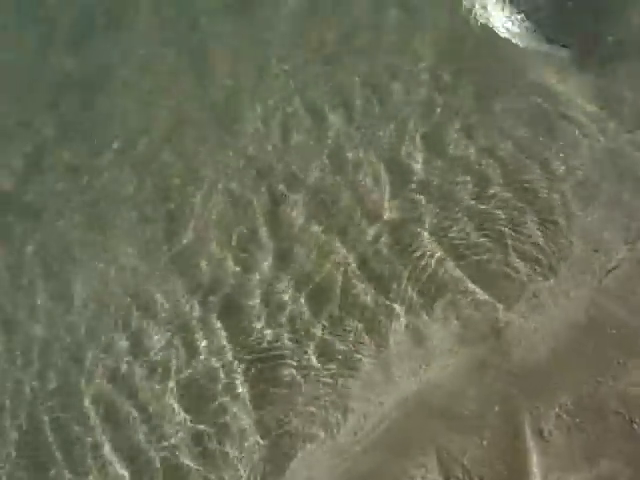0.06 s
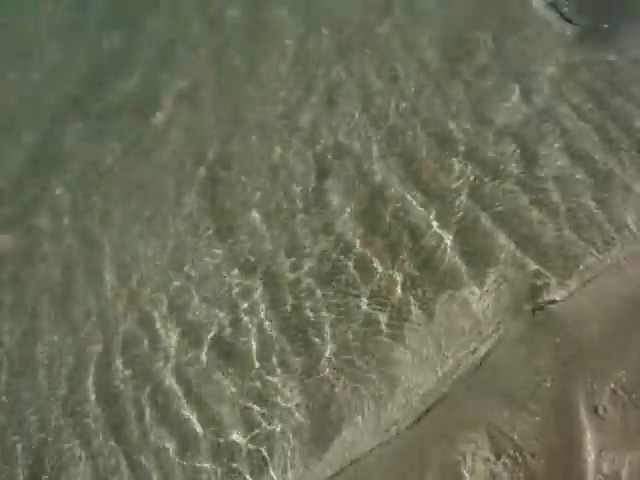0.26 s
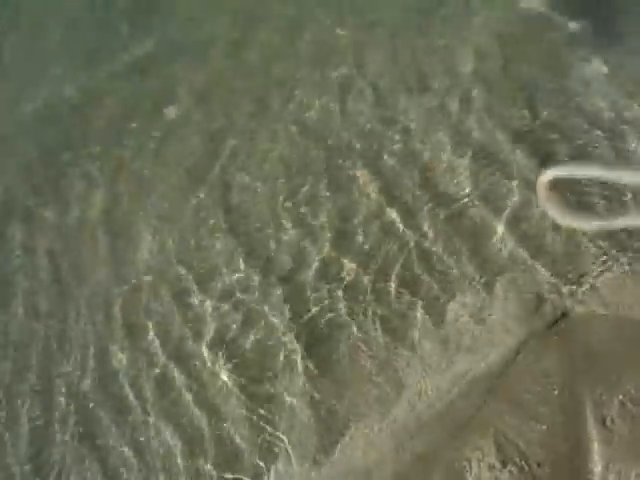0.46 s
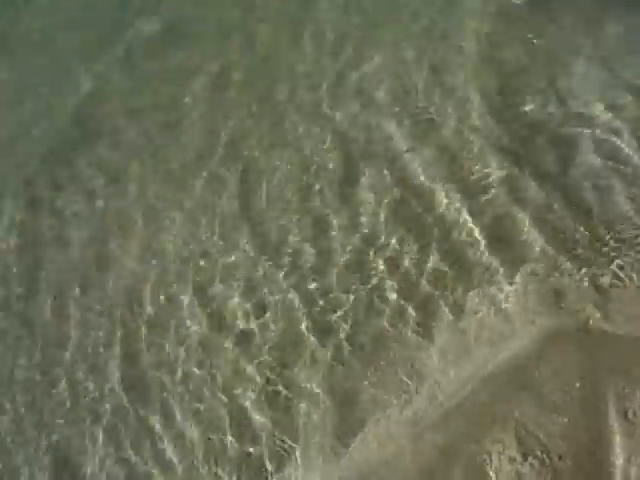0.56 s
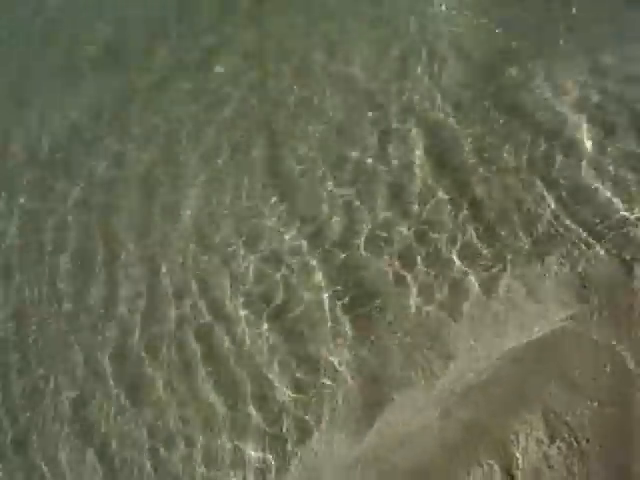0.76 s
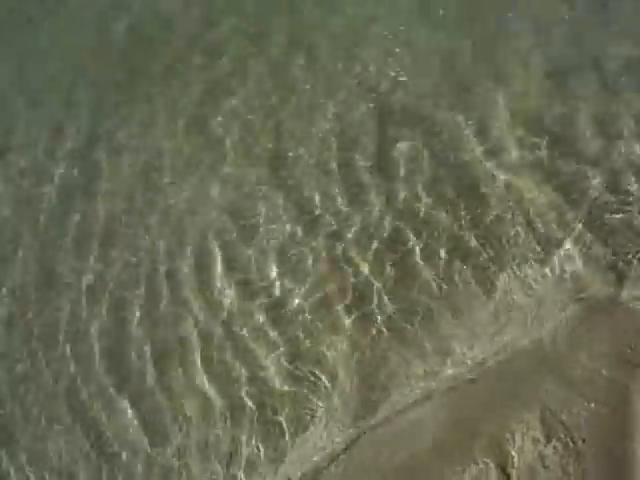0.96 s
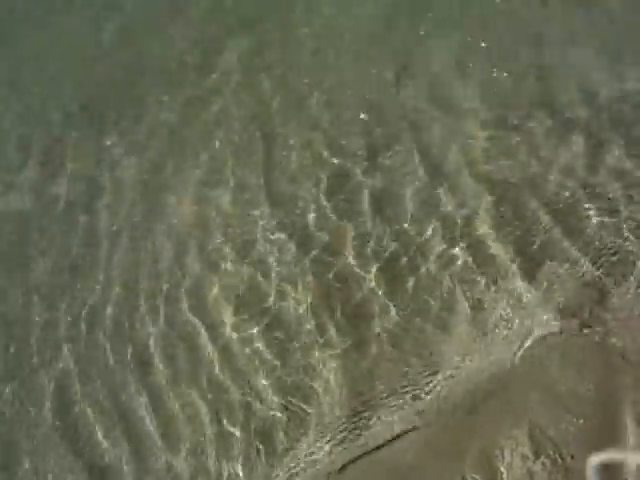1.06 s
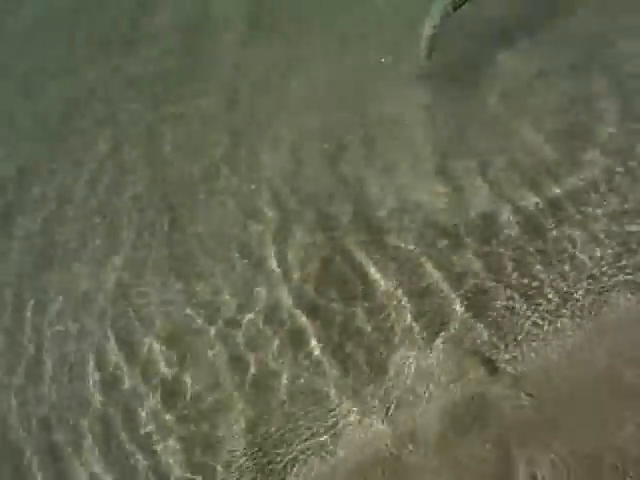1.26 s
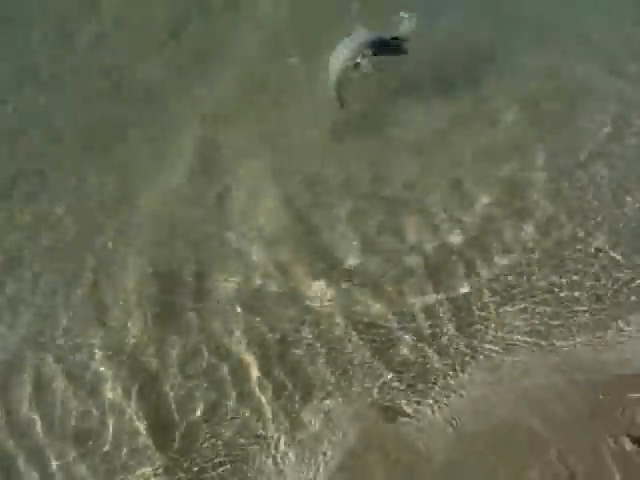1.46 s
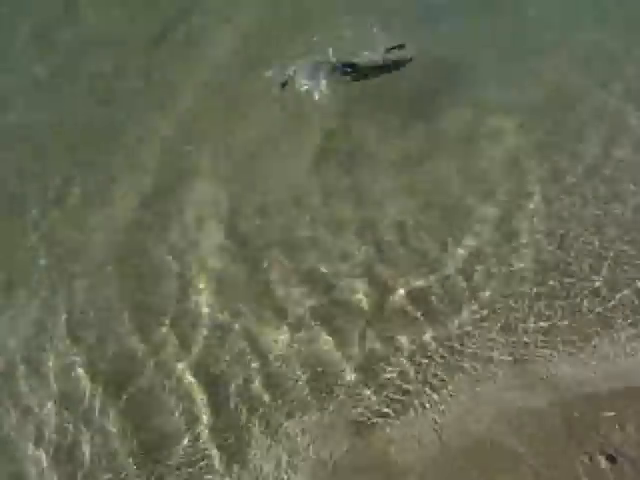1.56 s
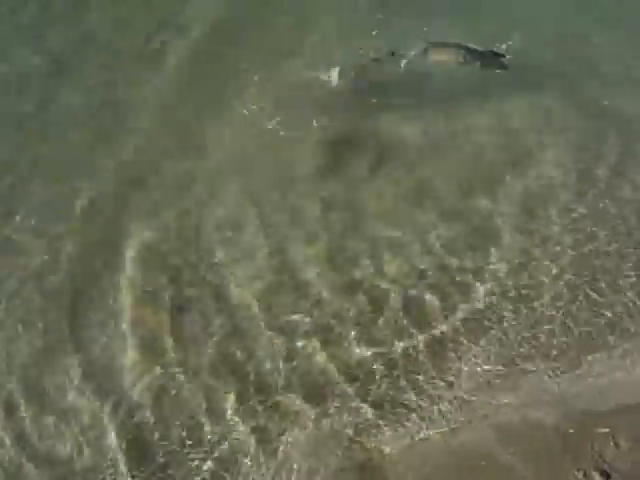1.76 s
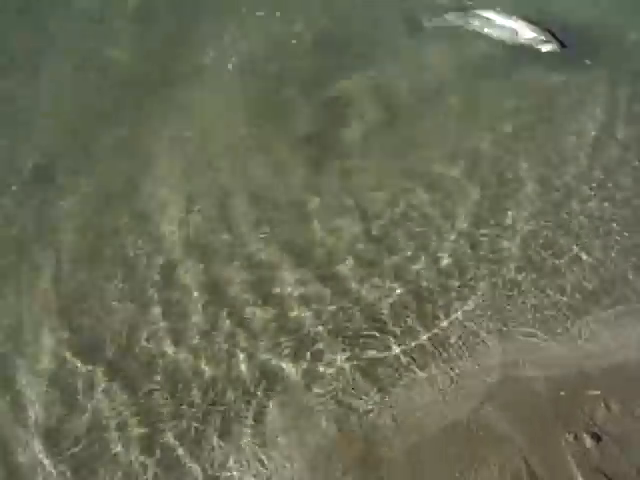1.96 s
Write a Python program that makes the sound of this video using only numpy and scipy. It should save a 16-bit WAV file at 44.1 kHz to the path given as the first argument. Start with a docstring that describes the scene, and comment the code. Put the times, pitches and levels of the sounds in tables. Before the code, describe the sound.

A fish thrashes in shallow water by a sandy shore. Soft trickling and low wind open, with a thump at 0.3 s; crisp slaps, spray and plops burst from 0.5 to 0.8 s, with a heavy wind bump near 0.6, then gurgles fade. Another bump comes at 1.04, a tiny plip at 1.28, and lighter splashes from 1.48 to 1.75, over steady hiss and faint high whine.

```python
"""A fish thrashes twice in shallow water off a sandy shore: slaps of spray built from showers of ringing
droplets, then plops and gurgles of trapped air, sung by short gliding sines.
Ripples trickle and fizz on the sand as finer droplets; wind rumbles as low coloured noise and bumps the
microphone with single push-pull swings.
The camera adds coloured hiss and a thin steady whine of three tones."""
import sys
import numpy as np
from scipy import signal
from scipy.fft import rfft, irfft
from scipy.io import wavfile
from scipy.ndimage import uniform_filter1d

SR = 44100
rng = np.random.default_rng(int(sys.argv[2]) if len(sys.argv) > 2 else 0)


def waveform_to_disk(signal):
    """Save audio, clipped to [-1, 1], as 16-bit WAV at the path in sys.argv[1]."""
    frames = np.transpose(np.atleast_2d(signal))
    scaled = np.clip(frames, -1, 1) * 32767
    samples = np.round(scaled).astype(np.int16)
    wavfile.write(sys.argv[1], SR, samples)


N = 88200  # two seconds
TIME = np.arange(N) / SR


def from_db(db):
    """Decibels to gain."""
    return 10 ** (np.asarray(db) / 20)


def rms_one(x):
    """Scale to unit rms."""
    return x / np.sqrt(np.mean(x ** 2) + 1e-20)


def add(out, start_s, sound):
    """Mix a sound in at its start time, cut at the end of the scene."""
    i = int(start_s * SR)
    out[i:i + len(sound)] += sound[:N - i]


def drift(rate):
    """Random wander: normal points of spread 1, rate per second, joined by straight lines."""
    return np.interp(TIME * rate, np.arange(1000), rng.standard_normal(1000))


def noise(colour, flicker_db):
    """Noise shaped by a spectral curve, with a flickering level; rms 1."""
    colour_hz, colour_db = np.transpose(colour)
    bin_hz = np.arange(N // 2 + 1) * SR / N
    gain = from_db(np.interp(np.log(bin_hz + 1), np.log(colour_hz), colour_db))
    coloured = irfft(rfft(rng.standard_normal(N)) * gain, N)
    flicker = from_db(flicker_db * drift(45.47))
    return rms_one(coloured * flicker)


def droplets(centre_hz, octaves, per_s, cycles, size_db, size):
    """Random droplets of uneven size ring for some cycles (to -60 dB), pitches spread round a centre; rms 1."""
    pitches = np.geomspace(350, 15000, 44)
    chance, sign, dealt = rng.random((3, size))
    drop_gain = from_db(size_db * np.minimum(rng.exponential(1, size), 5))
    clicks = (chance < per_s / SR) * np.sign(sign - .5) * drop_gain
    # deal each click a pitch from a bell curve in octaves
    weight = np.exp(-.5 * (np.log2(pitches / centre_hz) / octaves) ** 2)
    share = np.cumsum(weight)
    which = np.searchsorted(share / share[-1], dealt)
    out = np.zeros(size)
    for k, hz in enumerate(pitches):
        angle = 2 * np.pi * hz / SR
        radius = np.exp(-np.log(1000) * hz / (cycles * SR))
        zeros = np.sqrt(1 - radius * radius) * np.array([1, 0, -1])
        poles = [1, -2 * radius * np.cos(angle), radius * radius]
        # the tiny offset keeps the resonator clear of denormal numbers
        out += signal.lfilter(zeros, poles, clicks * (which == k) + 1e-18)
    return rms_one(out)


def camera():
    """Flickering hiss and a thin whine whose phase slides back through each camera frame, then jumps."""
    # hiss spectrum: (frequency [Hz], relative level [dB])
    hiss_colour = [(200, 5.5), (500, 1.5), (1000, 0.5), (2000, -2), (4000, -10.5), (6000, -8.5),
                   (8000, -4.5), (10000, -15.5), (12500, -4), (15500, -12.5)]
    # tones of the whine: (rms level [dB], phase slip per frame [cycles])
    whine_tones = [(-57, 0.51), (-53, 0.78), (-51.5, 0.56)]
    whine_hz, frames_per_s = (6606, 7522.5, 15045), 30
    out = from_db(-47) * noise(hiss_colour, flicker_db=2)
    # position within the frame, 0 to 1, with its jump smoothed
    frame = uniform_filter1d(TIME * frames_per_s % 1, size=130)
    for hz, (db, slip) in zip(whine_hz, whine_tones):
        tone = np.sin(2 * np.pi * (hz * TIME - slip * frame))
        out += from_db(db) * np.sqrt(2) * tone
    return out


def wind():
    """A low rumble of turbulence, and eddies that each push and pull the diaphragm once."""
    # rumble envelope: (time [s], level [dB])
    gusts = [(0, -49), (.25, -43.5), (.32, -31), (.37, -45.5), (.43, -34), (.6, -26), (.66, -36.5),
             (.73, -46), (.81, -29), (.9, -39), (1.05, -36), (1.12, -49), (1.4, -41), (1.46, -50.5),
             (1.68, -40), (1.75, -44.5), (1.86, -39), (2, -51)]
    # rumble spectrum: (frequency [Hz], relative level [dB])
    rumble_colour = [(20, -7), (45, -0.5), (90, 0), (150, -5.5), (250, -10.5), (400, -21), (800, -26.5),
                     (2000, -65)]
    # eddies bumping the microphone: (centre time [s], peak level [dB], nominal pitch [Hz])
    bumps = [(0.233, -28.5, 87.5), (0.305, -15, 175), (0.32, -37, 238), (.425, -25, 80), (0.477, -24.5, 85),
             (0.492, -20, 77), (.512, -23.5, 131), (0.5903, -10.5, 170), (0.599, -25.5, 141),
             (.615, -23.5, 132), (0.784, -21.5, 106), (1.025, -22, 105), (1.0383, -13.5, 218),
             (1.056, -24.5, 111), (1.376, -22.5, 243), (1.411, -31.5, 118), (1.678, -35, 56.3),
             (1.839, -29.5, 152)]
    bump_cycles, bump_skirt = 0.31, 0.31  # width in cycles of the pitch; narrowing of the skirts
    out = from_db(np.interp(TIME, *np.transpose(gusts))) * noise(rumble_colour, flicker_db=3)
    for centre_s, db, hz in bumps:
        u = (TIME - centre_s) * hz / bump_cycles
        swing = -u * np.exp(-u * u) / (1 + bump_skirt * u * u)
        out += from_db(db) * swing / swing.max()
    return out


def shore():
    """Ripples trickle and fine bubbles burst on the sand, both as showers of ringing droplets."""
    # strength of the lapping, on top of the trickle level: (time [s], level [dB])
    lapping = [(.14, 1.5), (.85, 2.5), (1.45, -6), (1.65, 4)]
    trickle = droplets(centre_hz=1900, octaves=.85, per_s=740, cycles=36, size_db=3, size=N)
    fizz = droplets(centre_hz=10800, octaves=0.19, per_s=220, cycles=18, size_db=4, size=N)
    trickle_db = -51 + np.interp(TIME, *np.transpose(lapping))
    return from_db(trickle_db) * trickle + from_db(-57) * fizz


def bubbles():
    """Trapped air rings unevenly, gliding in pitch and dying ever faster as it nears the surface."""
    # air pockets, level before envelope and flutter; a negative glide falls:
    # (time [s], starting pitch [Hz], level [dB], decay [s], glide [octaves/s])
    air_pockets = [(.5175, 666, -17, 0.0014, 6), (0.544, 1030, -30, 0.0088, 39),
                   (0.571, 6020, -22.5, 0.0033, -4), (0.636, 684, -29.5, 0.014, 72),
                   (0.733, 1897, -18.5, 0.0044, -31), (.7403, 7700, -31, 0.0019, -20),
                   (.7452, 3170, -20, 0.0013, 42), (0.7605, 2150, -26, 0.0054, 47),
                   (0.765, 5550, -25, 0.0016, -20), (.770, 1704, -31.5, 0.0086, -1),
                   (.801, 590, -38.5, 0.021, 3), (.825, 590, -31, 0.011, -20), (.834, 455.4, -28, 0.018, 9),
                   (.851, 656, -33, 0.019, 11.5), (.855, 930, -35, 0.013, 10.5),
                   (.893, 635, -33.5, 0.015, -4.5), (0.92, 1170, -31.5, 0.0048, 5.5),
                   (0.938, 1210, -32, 0.0031, -5), (1.102, 920, -32.5, 0.0057, -7),
                   (1.281, 1294, -27.5, 0.0027, -1), (1.493, 785, -19, 0.0015, 7),
                   (1.502, 1330, -31, 0.0027, 226), (1.542, 660, -30, 0.0063, -10),
                   (1.588, 320, -26.5, 0.0023, 2), (1.639, 732, -36, 0.015, 68),
                   (1.655, 1940, -29, 0.0029, 62), (1.6665, 2730, -27.5, 0.0025, -2),
                   (1.672, 746, -25.5, 0.015, 6), (1.684, 1010, -31.5, 0.009, 28),
                   (1.728, 3010, -34, 0.016, 18.5), (1.736, 442, -32, 0.029, 11.5),
                   (1.975, 745, -40.5, 0.064, -1.5)]
    attack_s, damping_power = 0.00045, 1.08
    wobble, flutter_db = 0.031, 1.65  # spread of pitch (as a fraction) and of level
    out, t = np.zeros(N), TIME[:SR // 5]
    for start_s, hz, db, decay, glide in air_pockets:
        glided_hz = hz * 2 ** np.clip(glide * t, -1, 2)
        pitch = glided_hz * (1 + wobble * drift(265)[:len(t)])
        envelope = (1 - np.exp(-t / attack_s)) * np.exp(-(t / decay) ** damping_power)
        gain = from_db(db + flutter_db * drift(225)[:len(t)])
        ring = np.sin(2 * np.pi * np.cumsum(pitch) / SR)
        add(out, start_s, gain * envelope * ring)
    return out


def splashes():
    """Each slap throws a clumped shower, dense if fine, sparse if coarse; longer ones build more slowly."""
    # slaps of water and sheets of spray, level before envelope and clumping:
    # (time [s], level [dB], decay [s], centre pitch [Hz], pitch spread [octaves])
    slaps = [(.487, -34, 0.0079, 9400, 0.18), (.497, -21, .001, 12500, 0.41),
             (0.5006, -16, 0.00081, 12400, 0.25), (0.502, -30, 0.011, 5960, 1.53),
             (.523, -31, 0.0084, 11800, 0.44), (.520, -33.5, 0.032, 2800, 0.98),
             (0.542, -27, 0.0074, 6000, 1.8), (0.55, -32, 0.0047, 11900, 0.56),
             (0.5701, -20, 0.0024, 3090, 1.1), (.574, -32, 0.023, 461, 0.56),
             (0.611, -43, 0.031, 1280, 0.5), (0.702, -36, 0.0038, 4360, 0.36),
             (0.7212, -31.5, .0013, 5900, 0.42), (0.732, -16.5, 0.00061, 10760, 0.83),
             (.733, -34, 0.022, 3180, 0.66), (.741, -31, 0.018, 802, 0.38), (.770, -24, 0.00088, 4950, 0.9),
             (0.82, -42.5, 0.043, 630, 0.5), (0.919, -35.5, 0.0042, 1740, 0.62),
             (1.2807, -34, 0.0023, 1690, 0.22), (1.478, -27.5, 0.004, 12300, 0.18),
             (1.485, -31, 0.0084, 11200, 0.49), (1.490, -33, 0.025, 2370, 1.28),
             (1.519, -27, 0.0051, 8300, 0.9), (1.5425, -23, 0.0013, 1900, 0.9),
             (1.5497, -37.5, 0.0039, 3460, 0.95), (1.665, -30, 0.0037, 5200, 1.34),
             (1.691, -40.5, 0.0057, 7100, 0.49), (1.727, -28, 0.0081, 7050, 0.82),
             (1.736, -31, 0.012, 7800, 0.21), (1.769, -43, 0.023, 3270, 0.5),
             (1.921, -37.5, .005, 3240, 0.64)]
    attack_share, clump_db = 0.23, 0.5  # attack as a share of the decay; spread of level
    grains_per_cycle = .7  # droplets per cycle of the centre pitch
    out, t = np.zeros(N), TIME[:SR // 5]
    for start_s, db, decay, hz, octaves in slaps:
        shower = droplets(hz, octaves, grains_per_cycle * hz, cycles=26.4, size_db=3, size=len(t))
        attack = attack_share * decay
        envelope = np.minimum(t / attack, 1) * np.exp(-np.maximum(t - attack, 0) / decay)
        gain = from_db(db + clump_db * drift(401)[:len(t)])
        add(out, start_s, gain * envelope * shower)
    return out


def scene():
    """Camera noise, wind, shore and thrashing fish at one microphone."""
    return (camera() + wind() + shore() + bubbles() + splashes())[None]


def record(dry):
    """A steep elliptic low-pass cuts the top above 15.8 kHz."""
    low_pass = signal.ellip(12, .1, 80, 15800, fs=SR, output="sos")
    return signal.sosfilt(low_pass, dry)


dry = scene()
out = record(dry)
waveform_to_disk(out)
```